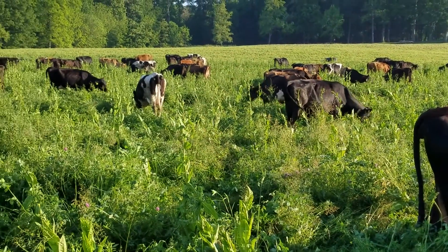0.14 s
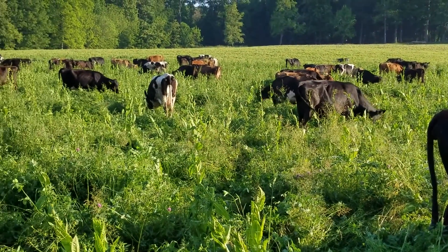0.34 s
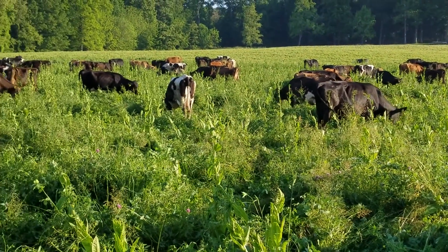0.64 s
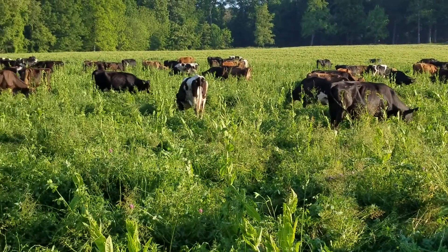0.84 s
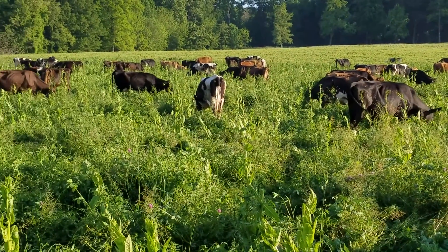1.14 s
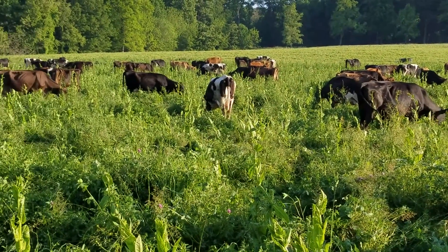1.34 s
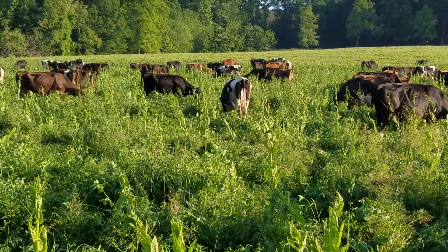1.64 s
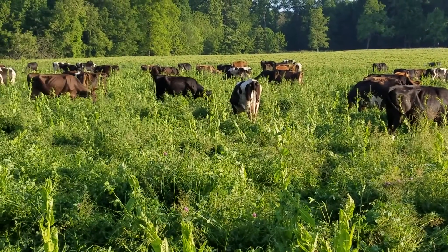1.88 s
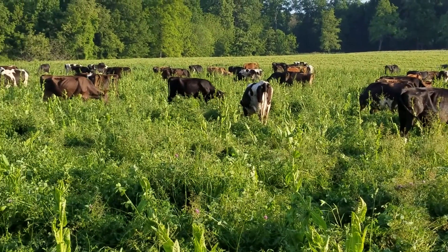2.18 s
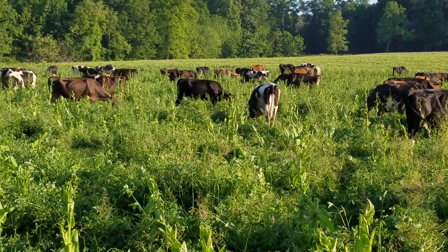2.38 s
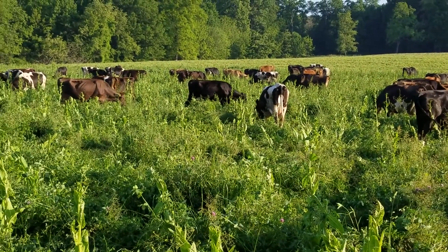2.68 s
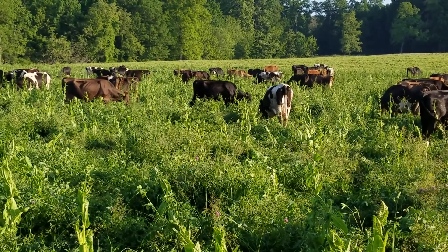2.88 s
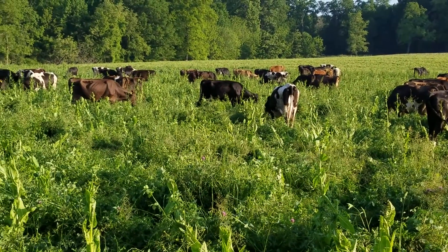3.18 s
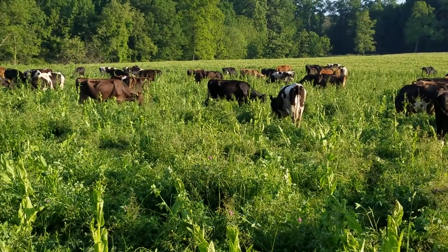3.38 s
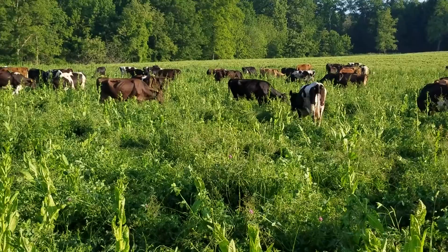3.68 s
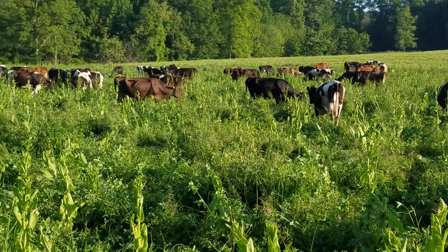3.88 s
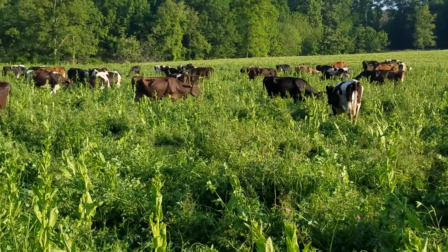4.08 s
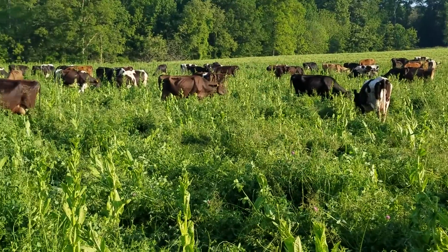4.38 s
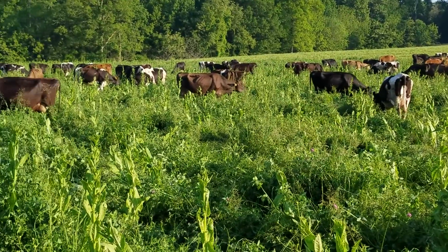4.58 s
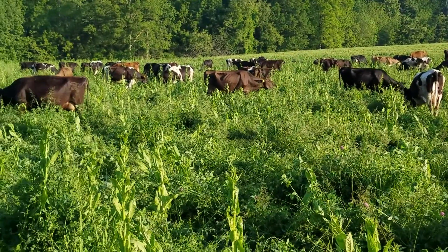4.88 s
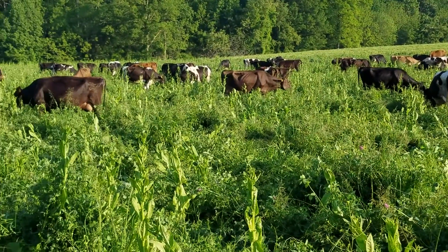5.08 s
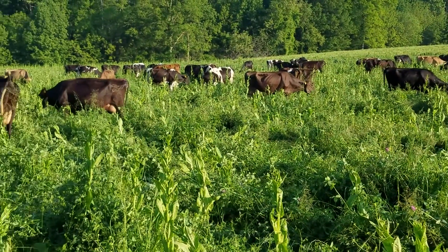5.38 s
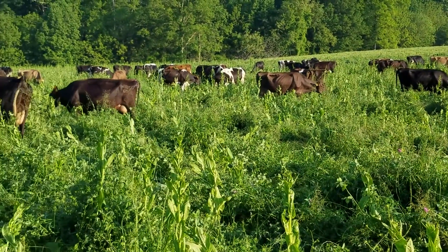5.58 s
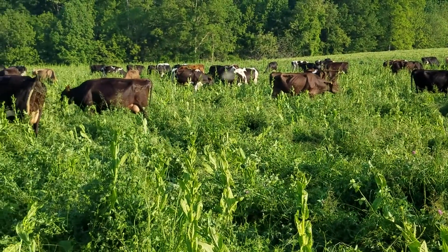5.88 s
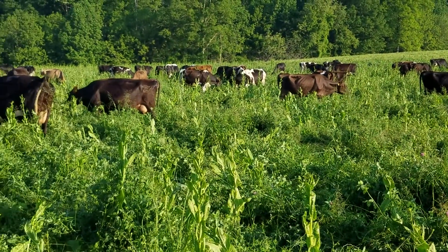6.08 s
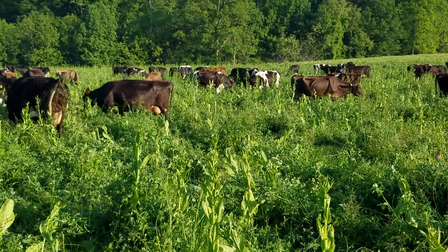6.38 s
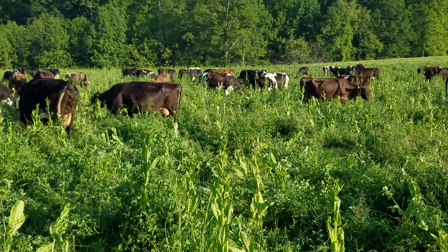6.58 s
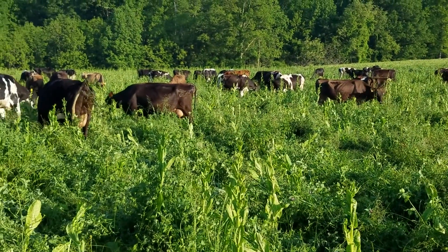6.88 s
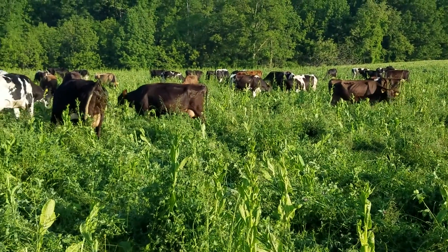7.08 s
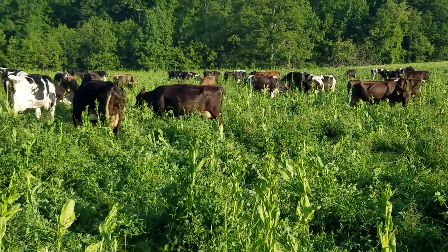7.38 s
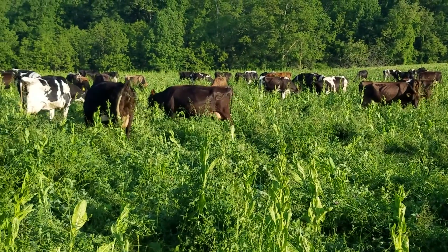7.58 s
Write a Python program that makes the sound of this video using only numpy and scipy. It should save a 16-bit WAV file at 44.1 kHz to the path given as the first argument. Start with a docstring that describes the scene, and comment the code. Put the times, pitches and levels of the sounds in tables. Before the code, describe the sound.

A far engine rumbles steadily beneath the rustle and crunch of grazing cows, with faint birdsong around the pasture.

```python
"""A far engine rumbles under a wash of distant noise, partly from the left, while cows graze close by.
Tall grass rustles, tears in bunches and snaps: each breaking fibre is a burst of fading noise.
A songbird on the right repeats a few motifs; others chip in runs, slur, twitter and whistle in
gliding near-sine notes, and one ends in a buzzy trill. Plants and trees add a short tail.
Light air flutters on the microphone and gusts twice."""
import sys
import numpy as np
from scipy import signal
from scipy.fft import rfft, irfft
from scipy.io import wavfile
from scipy.ndimage import map_coordinates

SR = 44100
rng = np.random.default_rng(int(sys.argv[2]) if len(sys.argv) > 2 else 0)


def dump_mix(stems):
    """Bounce the given channels to the path in sys.argv[1] as a 16-bit WAV at rate SR."""
    frames = np.atleast_2d(stems).T  # one column per channel
    limited = np.clip(frames, -1, 1)  # hard clip at full scale
    pcm = np.round(limited * 32767).astype(np.int16)
    wavfile.write(sys.argv[1], SR, pcm)


N = 341404
TIME_S = np.arange(N) / SR
BINS_HZ = np.maximum(np.fft.rfftfreq(N, 1 / SR), 1)

# Table levels precede each source's gains and filters. Pan is left minus right.
# Engine roar. Each row: frequency in Hz, relative density in dB.
ROAR_SPECTRUM = [(15, -15), (25, -27), (36, -10.5), (48, -4.5), (60, 6), (70, -0.5), (92, 7), (106, -2),
                 (128, 2.5), (152, -14), (168, -5.5), (180, -14), (220, -14.5), (300, -23.5), (500, -66)]
# Engine tones. Each row: frequency in Hz, width in Hz, level in dB.
ENGINE_TONES = [(79.34, 3.025, -49.5), (116.9, 4.98, -51.5), (144.4, 2.15, -49), (163.2, 5, -50),
                (217.2, 7.75, -67.5), (358, 6.43, -71), (472.4, 1.65, -62.5), (521, 5, -70),
                (955, 5.2, -72)]
# Rumble swell. Each row: middle and length in seconds, level in dB.
RUMBLE_SWELLS = [(3.25, 0.53, -43.5)]
# Distant wash. Each row: frequency in Hz, left and right density in dB.
WASH_SPECTRUM = [(189, -75.5, -75), (307, -78.5, -80.5), (410, -80.5, -78), (730, -83, -82.5),
                 (1130, -82.5, -80.5), (1214, -87.5, -83.5), (1900, -90, -88), (2340, -94.5, -98),
                 (2650, -95.5, -96.5), (3750, -106, -101), (5560, -113, -109), (7900, -119, -111),
                 (10500, -119, -104), (12000, -109, -111), (15300, -110, -110)]
# Directional part of the wash. Each row: frequency in Hz, power share from 0 to 1, left lead in ms.
WASH_DIRECTION = [(191, 0.84, 0.13), (348, 0.92, 0.23), (500, 0.75, 0.43), (690, 0.92, 0.38),
                  (1133, 0.93, 0.42), (1460, 0.42, 0.42), (1640, 0.32, 0.55), (2075, 1, 0.6),
                  (2400, 0.26, 0.55), (3030, 0.16, 0.456), (7000, 0.02, 0.51)]
# The microphone turns. Each row: time in seconds, added left lead in ms, wash gain in dB.
MIC_TURN = [(0, 0.052, 2.5), (.2, -0.028, 1.2), (.5, 0.021, 0), (1.8, -0.0017, 0.85), (3.0, -0.0019, 0.6),
            (4.5, -0.0086, 1.5), (6.0, -0.062, 0.3), (7.74, -0.049, 2)]
# Swells of noise near 1.8 kHz. Each row: middle and length in seconds, level in dB.
MID_BAND_SWELLS = [(0.11, 0.17, -59.5), (1.5, 1, -66.5), (3.03, .12, -60), (3.6, 1, -69.5)]
# Gusts. Each row: middle and length in seconds, level in dB.
GUSTS = [(5.0, 0.8, -47.5), (6.6, 0.56, -43.5)]

# Far chirps. Each row: start and end in seconds, level and pan in dB, lowest and highest centre in Hz.
FLURRIES = [(.1, 3.3, -76, -2, 2800, 4200), (3.42, 3.8, -73, -3, 3010, 4300),
            (5.1, 7.1, -77.5, -9, 3100, 4100)]
# Chirp count of each flurry.
CHIRPS_IN_FLURRY = (16, 24, 20)
# Far twitter. Each row: start and length in seconds, level in dB, three pitches in Hz.
TWITTER_NOTES = [(5.455, .018, -74, 3400, 4100, 4900), (6.038, .018, -71.5, 3500, 4100, 4800),
                 (6.145, .04, -78.5, 5450, 5350, 5600), (6.24, .035, -77, 3900, 4500, 4650),
                 (6.36, .02, -75.5, 3400, 3800, 4100), (6.385, .028, -80, 4600, 5200, 5600),
                 (6.6, .025, -77, 4700, 4100, 3600), (6.818, .032, -75, 4150, 4700, 4950),
                 (6.848, .024, -74.5, 4800, 3950, 3300)]
# Plain whistles. Each row: start and length in seconds, level and pan in dB, five pitches in Hz.
WHISTLE_NOTES = [(0, 0.047, -74, -11, 4050, 4000, 4000, 4020, 3900),
                 (1.4, 0.042, -73, -10, 4430, 4330, 4330, 4320, 4300),
                 (4.312, .026, -69, -6, 4920, 4980, 5080, 5130, 5230),
                 (4.405, .135, -66.5, -2, 5200, 5030, 5010, 4870, 4870),
                 (4.53, 0.122, -69, 0, 4820, 4870, 4920, 4900, 4860),
                 (4.645, .04, -78, -1, 4770, 4720, 4640, 4620, 4600),
                 (5.71, 0.132, -69, 5.5, 2500, 2380, 2346, 2340, 2350),
                 (6.45, 0.59, -78, 9, 2690, 2730, 2724, 2785, 2760),
                 (6.98, 0.065, -66, 14, 2780, 2800, 2890, 3040, 3220)]
# One slur: fall, rise, drop. Each row: delay and length in seconds, three pitches in Hz.
SLUR_SHAPE = [(0, 0.03, 3550, 2980, 2740), (0.031, 0.044, 2740, 2950, 3380),
              (0.078, .022, 3250, 2930, 2700)]
# Slurred calls. Each row: start in seconds, levels of fall, rise and drop in dB.
SLUR_CALLS = [(.255, -76, -76, -81), (.55, -77, -77, -82), (1.06, -86, -78, -84), (1.192, -72, -83, -86),
              (1.495, -72, -72, -78), (2.044, -77, -87, -86), (2.441, -76, -71, -75),
              (3.38, -72, -70.5, -74), (3.91, -70, -78, -81), (4.42, -76, -77, -74), (4.88, -72, -76, -77),
              (5.41, -76, -83, -82), (6.428, -68, -84, -84)]
# One chip: steep rise, flick down. Each row: delay and length in seconds, gain in dB, three pitches in Hz.
CHIP = [(0, .024, 3, 3336, 4090, 4930), (.025, 0.0093, -12, 4930, 3770, 2800)]
# Chip runs. Each row: start, first gap and gap growth in seconds; level, fade at the ends and pan in dB.
CHIP_RUNS = [(2.569, .0765, .0009, -64.5, 5, -4), (3.73, .0865, .006, -68.5, 5, -10.5)]
# Chip count of each run.
CHIPS_IN_RUN = (11, 7)
# Lead-in to the trill. Each row: start and length in seconds, level and pan in dB, three pitches in Hz.
TRILL_LEAD = [(7.052, 0.044, -64, -9, 2430, 2410, 2420), (7.06, 0.052, -65.5, -11, 2130, 2154, 2160),
              (7.15, .042, -62, 6, 1606, 1635, 1660), (7.159, 0.007, -62.5, -14, 4700, 3500, 2700),
              (7.203, .013, -62, -6, 2020, 2180, 2380), (7.225, 0.013, -67, -14, 4860, 5140, 5460)]
# Course of the trill. Each row: time in seconds, beats per second, level in dB.
TRILL_CURVE = [(7.29, 33, -78), (7.305, 33, -62.5), (7.5, 30, -60.5), (7.65, 27, -60.5), (7.74, 26, -62)]
# Buzz partials. Each row: harmonic number, gain and pan in dB.
BUZZ_PARTIALS = [(4, -10, -3), (5, -2.8, 4.5), (6, -8.3, -6.5), (7, -11.7, 3), (8, -25, 0), (9, -9.5, -8)]
# Songbird motifs. Each row: syllable delay and length in seconds, gain in dB, four pitches in Hz.
OPENING = [(0, .052, -6, 6760, 7060, 7400, 7550), (.068, .033, -2.5, 5240, 5650, 5880, 5700),
           (.094, .028, .5, 5400, 4550, 3950, 3500), (.146, .042, -3, 4640, 4670, 4670, 4620)]
ARCH = [(0, 0.048, 4, 3790, 3760, 3600, 3170), (.088, 0.072, -2.8, 5680, 6240, 6440, 5640),
        (0.154, 0.024, -6.5, 5630, 4600, 3620, 2700)]
BOW = [(0, 0.029, 3.5, 3150, 3600, 3920, 4200), (.036, .025, -3, 4250, 4360, 4700, 4850),
       (.072, .062, -3, 5000, 4630, 4200, 4050)]
QUICK_PAIR = [(0, 0.0247, 0, 4270, 3940, 3550, 3250), (0.054, .053, 0, 3320, 3710, 3940, 4180)]
CHATTER = [(-.006, 0.04, -1.1, 4780, 4300, 3970, 3800), (.085, 0.0307, 0.15, 4390, 3950, 3650, 3440),
           (.192, .078, -1, 2880, 3280, 3800, 4600)]
# The song. Each row: start in seconds, motif, level in dB.
PHRASES = [(1.554, OPENING, -70), (1.817, OPENING, -68), (2.083, OPENING, -68), (2.349, ARCH, -65),
           (2.584, ARCH, -64.5), (2.828, BOW, -65), (3.09, QUICK_PAIR, -65.5), (3.296, QUICK_PAIR, -64.5)]
# Closing chatter. Each row: start in seconds, level in dB.
CHATTER_REPEATS = [(3.55, -74.5), (3.914, -76), (4.279, -72), (4.68, -72.5)]

# Crunch of breaking grass. Each row: frequency in Hz, left and right relative level in dB.
CRUNCH_SPECTRUM = [(1510, -10, 5.5), (2660, 4.5, 3), (3740, -15, 0.5), (4930, -6, -16), (7170, -24, -10),
                   (8900, -27, -3), (10240, -37, 5), (12300, -10, -5.5), (13200, -7, -13), (14200, -3, -6),
                   (15800, -19, 2.5)]
# Thin crack of dry fibres. Each row: frequency in Hz, left and right relative level in dB.
CRACK_SPECTRUM = [(8000, -30, -17), (10500, -12, -14), (12600, 0, -1), (15400, 0, 2)]
# The herd stirs the grass, less as it falls behind. Each row: time in seconds, level in dB.
HERD_STIR = [(0, -72), (1.1, -66.5), (2.2, -70.5), (4.6, -67), (5.1, -92), (7.74, -84)]
# A muzzle or leg pushes through stems. Each row: middle and length in seconds, level in dB.
SWISHES = [(.19, 0.15, -60.5), (.52, 0.089, -59), (.87, 0.28, -66), (1.28, 0.097, -64.5), (1.65, .17, -63),
           (2.08, 0.071, -65), (2.63, 0.14, -60.5), (3.47, 0.082, -59), (4.24, 0.089, -61),
           (4.77, 0.1, -64), (5.39, 0.096, -63.5), (6.22, 0.15, -66), (6.56, .07, -64), (6.95, 0.2, -67)]
# A bunch tears. Each row: start and length in seconds, crunch and crack level in dB.
TEARS = [(0.803, 0.05, -73, -68), (0.816, 0.0086, -66.5, -63), (1.368, 0.012, -59, -72),
         (1.441, 0.017, -63.5, -74), (1.593, 0.07, -67, -77), (1.702, 0.054, -63.5, -82),
         (3.02, 0.047, -55.5, -74), (3.745, 0.041, -61.5, -76), (3.797, 0.064, -64, -75),
         (4.104, 0.029, -69, -76), (4.393, 0.016, -61.5, -70), (4.585, .024, -74, -67),
         (5.733, 0.042, -72, -69), (6.536, 0.049, -61.5, -80), (7.076, 0.027, -65.5, -80),
         (7.259, 0.015, -58, -72), (7.29, 0.045, -64, -74)]
# A thick stem snaps. Each row: start in seconds, crunch and crack level in dB.
SNAPS = [(0.038, -60, -62), (.25, -58.5, -68), (.298, -63, -60), (0.747, -64, -75), (.813, -68, -56),
         (0.917, -60, -64), (1.481, -53, -72), (1.515, -62, -70), (1.623, -57, -65), (1.652, -57, -65),
         (1.661, -56, -65), (1.739, -59, -66), (1.859, -60, -68), (2.035, -65, -70), (2.075, -59, -70),
         (2.372, -63, -70), (3.046, -56, -66), (3.857, -57, -63), (4.397, -61, -65), (4.45, -56, -59),
         (4.62, -62, -58), (4.934, -62, -67), (5.103, -64, -67), (5.407, -62, -66), (5.862, -66, -72),
         (6.155, -60, -56), (6.178, -64, -70), (7.26, -61, -62), (7.316, -58, -62)]


def from_db(db):
    """Decibels to gain."""
    return 10 ** (np.asarray(db) / 20)


def unit_rms(x):
    """Scale to unit power."""
    return x / np.sqrt(np.mean(x ** 2) + 1e-20)


def in_time(rows):
    """Each column of a curve at every sample."""
    times_s, *columns = np.transpose(rows)
    return [np.interp(TIME_S, times_s, c) for c in columns]


def in_hz(rows):
    """Each column of a spectrum at every bin."""
    hz, *columns = np.transpose(rows)
    return np.array([np.interp(np.log(BINS_HZ), np.log(hz), c) for c in columns])


def colour(x, gain):
    """Filter by a gain per bin."""
    return irfft(rfft(x) * gain, N)


def highpass(edge_hz):
    """Fourth-order high-pass gain per bin."""
    return 1 / np.sqrt(1 + (edge_hz / BINS_HZ) ** 8)


def band_noise(centre_hz, sharpness, order=2, shape=N):
    """Unit-power noise in one band."""
    detuning = sharpness * (BINS_HZ / centre_hz - centre_hz / BINS_HZ)
    return unit_rms(colour(rng.standard_normal(shape), 1 / (1 + detuning ** order)))


def drift(rate_hz):
    """Unit-power random wander, mostly below rate_hz."""
    return unit_rms(colour(rng.standard_normal(N), 1 / (1 + (BINS_HZ / rate_hz) ** 2)))


def swells(rows, floor_db=-np.inf):
    """Bell-shaped swells add in power over a floor; length is the time above half power."""
    power = from_db(floor_db) ** 2
    for middle_s, length_s, level_db in rows:
        bell = 0.5 ** np.minimum((2 * (TIME_S - middle_s) / length_s) ** 2, 100)
        power = power + from_db(level_db) ** 2 * bell
    return np.sqrt(power)


def pan(pan_db):
    """Left and right gains; positive is left."""
    return from_db(np.array([[0.5], [-0.5]]) * pan_db)


def from_left(x, lead_ms):
    """Stereo pair in which the right side arrives lead_ms later."""
    delayed = map_coordinates(x, [np.arange(N) - lead_ms * SR / 1000], order=3, mode="nearest")
    return np.array([x, delayed])


def scatter(x, tail_db, rt60_s):
    """Plants and trees add a thin, short tail."""
    age_s = TIME_S[:SR // 2]
    response = rng.standard_normal((2, len(age_s))) * from_db(-60 * age_s / rt60_s)
    response *= from_db(tail_db) / np.sqrt(np.sum(response ** 2) / 2)
    return x + signal.fftconvolve(x, response, axes=1)[:, :N]


def engine(roar_db=-41.5, pan_db=1.1):
    """Only the low roar and a few tones carry this far; the air makes the tones waver."""
    spectrum = from_db(in_hz(ROAR_SPECTRUM)[0]) * (BINS_HZ < 900)
    sound = from_db(roar_db) * unit_rms(colour(rng.standard_normal(N), spectrum))
    for hz, width_hz, level_db in ENGINE_TONES:
        phase = 2 * np.pi * np.cumsum(hz + 0.4024 * width_hz * drift(3.94)) / SR
        sound += from_db(level_db) * unit_rms(np.sin(phase) * from_db(1.9 * drift(width_hz)))
    return from_left(sound, lead_ms=0.29) * pan(pan_db)


def rumble_swell(pan_db=1.0):
    """The upper part of the rumble rises for a moment."""
    rumble = swells(RUMBLE_SWELLS) * band_noise(centre_hz=143, sharpness=5.8, order=6)
    return from_left(rumble, lead_ms=0.34) * pan(pan_db)


def distant_wash(gain_db=-1.46, waver_db=0.4):
    """Distant noise, partly from the left and partly from all round."""
    share, lead_ms = in_hz(WASH_DIRECTION)
    turn_ms, turn_db = in_time(MIC_TURN)
    right_lag = np.exp(-2j * np.pi * BINS_HZ * lead_ms / 1000 * np.array([[0], [1]]))
    directed = colour(from_left(rng.standard_normal(N), turn_ms), np.sqrt(share) * right_lag)
    diffuse = colour(rng.standard_normal((2, N)), np.sqrt(1 - share))
    wash = colour(directed + diffuse, from_db(in_hz(WASH_SPECTRUM)) * highpass(216)) * np.sqrt(SR / 2)
    return wash * from_db(gain_db + turn_db + waver_db * drift(3.2))


def mid_band_swell(pan_db=-2):
    """A band of noise near 1.8 kHz swells, partly the crunch of tearing grass."""
    return swells(MID_BAND_SWELLS) * band_noise(centre_hz=1780, sharpness=5, shape=(2, N)) * pan(pan_db)


def breeze(pan_db=2.5):
    """Light air makes a soft, low flutter on the microphone."""
    return swells(GUSTS, floor_db=-54.5) * band_noise(centre_hz=50, sharpness=3.6) * pan(pan_db)


def glides(notes, taper, waver, flutter_db, lead_ms=0, tilt_db_per_oct=0):
    """Near-sine notes bend through their pitches; paths through the grass make them flutter."""
    out = np.zeros((2, N))
    wobble = 1 + waver * drift(270)
    flutter = from_db(flutter_db * np.array([drift(130), drift(140)]))
    for start_s, length_s, level_db, pan_db, *pitches_hz in notes:
        span = np.arange(int(start_s * SR), min(int((start_s + length_s) * SR), N))
        bend = np.polyfit(np.linspace(0, 1, len(pitches_hz)), pitches_hz, len(pitches_hz) - 1)
        hz = np.polyval(bend, np.linspace(0, 1, len(span))) * wobble[span]
        cycles = np.cumsum(hz) / SR - hz * np.array([[0], [lead_ms]]) / 1000
        envelope = signal.windows.tukey(len(span), taper) * flutter[:, span]
        gain = from_db(level_db + tilt_db_per_oct * np.log2(hz / 4000))
        out[:, span] += gain * pan(pan_db) * unit_rms(envelope * np.sin(2 * np.pi * cycles))
    return out


def motif_notes(motif, start_s, level_db, pan_db):
    """Notes of one motif at a given time, level and side."""
    return [(start_s + delay_s, length_s, level_db + gain_db, pan_db, *pitches_hz)
            for delay_s, length_s, gain_db, *pitches_hz in motif]


def far_birds(chirp_s=0.025, bend=0.126):
    """Flurries of faint chirps at uneven times and pitches, each rising or falling steeply."""
    notes = []
    for (start_s, end_s, level_db, pan_db, low_hz, high_hz), count in zip(FLURRIES, CHIRPS_IN_FLURRY):
        for k, (jitter, height, coin) in enumerate(rng.random((count, 3))):
            onset_s = start_s + (end_s - start_s) * (k + jitter) / count
            hz = low_hz * (high_hz / low_hz) ** height
            rise = bend * np.sign(coin - 0.5)
            notes.append((onset_s, chirp_s, level_db, pan_db, hz * (1 - rise), hz * (1 + rise)))
    return glides(notes, taper=0.4, waver=0.012, flutter_db=4.5)


def twittering_bird(pan_db=-10):
    """Loose, hoarse notes from far to the right."""
    notes = [(start_s, length_s, level_db, pan_db, *pitches_hz)
             for start_s, length_s, level_db, *pitches_hz in TWITTER_NOTES]
    return glides(notes, taper=0.28, waver=0.023, flutter_db=3)


def whistling_birds():
    """Plain, nearly steady tones."""
    return glides(WHISTLE_NOTES, taper=0.15, waver=0.0075, flutter_db=0.5)


def slurring_bird(pan_db=14.5):
    """A slightly hoarse call on the left falls, rises and drops, with shifting stress."""
    notes = []
    for start_s, *levels_db in SLUR_CALLS:
        for (delay_s, length_s, *pitches_hz), level_db in zip(SLUR_SHAPE, levels_db):
            notes.append((start_s + delay_s, length_s, level_db, pan_db, *pitches_hz))
    return glides(notes, taper=0.25, waver=0.018, flutter_db=2.5)


def chipping_birds():
    """Each run repeats one chip; the gaps lengthen while the level rises and falls."""
    notes = []
    for (start_s, gap_s, growth_s, level_db, fade_db, pan_db), count in zip(CHIP_RUNS, CHIPS_IN_RUN):
        for k, from_middle in enumerate(np.linspace(-1, 1, count)):
            onset_s = start_s + k * gap_s + growth_s * k * (k - 1) / 2
            notes += motif_notes(CHIP, onset_s, level_db - fade_db * from_middle ** 2, pan_db)
    return glides(notes, taper=0.38, waver=0.012, flutter_db=4.5, tilt_db_per_oct=-6)


def trill_lead():
    """Short low and high notes ahead of the trill."""
    return glides(TRILL_LEAD, taper=0.39, waver=0.014, flutter_db=2.5)


def trill(buzz_hz=567, rasp_db=2.5, blip_db=5, blip_low_hz=2550, blip_top_hz=3000):
    """Quick falling chips, then an arched blip of uneven force alternates with a buzz, slowing down."""
    beats_per_s, level_db = in_time(TRILL_CURVE)
    singing = TIME_S > TRILL_CURVE[0][0]
    beat = (np.cumsum(beats_per_s * singing) / SR + 0.6) % 1
    arch = np.exp(-((beat - 0.14) / 0.14) ** 2)
    blip_hz = (blip_low_hz + (blip_top_hz - blip_low_hz) * arch) * (1 + 0.035 * drift(300))
    blip_gain = from_db(blip_db + 2 * drift(60)) * pan(4) * arch
    voice = blip_gain * np.sin(2 * np.pi * np.cumsum(blip_hz) / SR)
    buzz_gate = np.interp(beat, [0, 0.25, 0.38, 0.92, 1], [0.15, 0.15, 1, 1, 0.15])
    buzz_phase = 2 * np.pi * np.cumsum(buzz_hz * (1 + 0.0055 * drift(116))) / SR
    for harmonic, gain_db, pan_db in BUZZ_PARTIALS:
        rasp = unit_rms(from_db(rasp_db * drift(150)))
        voice += from_db(gain_db) * pan(pan_db) * buzz_gate * rasp * np.sin(harmonic * buzz_phase)
    chip_notes = [(7.234 + 0.0085 * k, 0.007, -58 - 1.2 * k, 0, 5300, 3200, 2900) for k in range(7)]
    chips = glides(chip_notes, taper=0.4, waver=0.03, flutter_db=2.5)
    return chips + np.sqrt(2) * voice * singing * from_db(level_db)


def songbird(pan_db):
    """A bubbling song of repeated motifs; its high notes arrive weaker."""
    notes = []
    for start_s, motif, level_db in PHRASES:
        notes += motif_notes(motif, start_s, level_db, pan_db)
    return glides(notes, taper=0.38, waver=0.007, flutter_db=2.2, lead_ms=-0.048, tilt_db_per_oct=-5.5)


def songbird_chatter(pan_db):
    """The soft, slightly hoarse close of the song."""
    notes = []
    for start_s, level_db in CHATTER_REPEATS:
        notes += motif_notes(CHATTER, start_s, level_db, pan_db)
    return glides(notes, taper=0.23, waver=0.016, flutter_db=3, tilt_db_per_oct=-11)


def fibres(per_s, spread_db, decay_s):
    """Fibres break at random with uneven force; leaves scatter each crack differently to each side."""
    breaks = rng.random(N) < per_s / SR
    force = from_db(spread_db * np.minimum(rng.exponential(1, N), 4))
    power = signal.lfilter([1], [1, -np.exp(-1 / (decay_s * SR))], (breaks * force) ** 2 + 1e-18)
    return unit_rms(np.sqrt(power) * rng.standard_normal((2, N)))


def stirring_leaves(rustle_db=-0.5, tick_db=-9, shake_delay_s=0.042, shake_s=0.098, shake_db=-1.5):
    """Rustle and small ticks: cows push through the plants, which also shake after each tear."""
    shakes = [(start_s + shake_delay_s, shake_s, crunch_db + shake_db)
              for start_s, _, crunch_db, _ in TEARS]
    motion = swells(SWISHES + shakes, floor_db=in_time(HERD_STIR)[0]) * from_db(1.5 * drift(14))
    rustle = from_db(rustle_db) * motion * fibres(per_s=6800, spread_db=-2, decay_s=0.0004)
    ticks = from_db(tick_db) * motion * fibres(per_s=70, spread_db=2.5, decay_s=0.0015)
    return rustle, ticks


def tearing_bunches(gain_db=6.5):
    """Crunch and crack of many fibres ripping together."""
    envelopes = np.zeros((2, 1, N))
    for start_s, length_s, *levels_db in TEARS:
        corners_s = start_s + length_s * np.array([-0.22, 0.041, 0.62, 1.4])
        envelopes += from_db(levels_db)[:, None, None] * np.interp(TIME_S, corners_s, [0, 1, 1, 0])
    return from_db(gain_db) * envelopes * fibres(per_s=1000, spread_db=2.1, decay_s=0.0006)


def snapping_stems(gain_db=8, crunch_decay_s=0.0048, crack_decay_s=0.0028):
    """Crunch and crack of single thick stems: sudden noise that dies fast."""
    envelopes = np.zeros((2, 1, N))
    for start_s, crunch_db, crack_db in SNAPS:
        first = int(start_s * SR)
        age_s = TIME_S[:min(SR // 10, N - first)]
        span = slice(first, first + len(age_s))
        envelopes[0, 0, span] += from_db(crunch_db) * np.exp(-age_s / crunch_decay_s)
        envelopes[1, 0, span] += from_db(crack_db) * np.exp(-age_s / crack_decay_s)
    return from_db(gain_db) * envelopes * rng.standard_normal((2, 2, N))


def grazing():
    """Cows stir, tear and snap the grass; thin leaves lack the low crunch of the stems."""
    rustle, ticks = stirring_leaves()
    tear_crunch, tear_crack = tearing_bunches()
    snap_crunch, snap_crack = snapping_stems()
    stem_gain = unit_rms(from_db(in_hz(CRUNCH_SPECTRUM)) * highpass(1300))
    leaves = colour(rustle + tear_crunch, stem_gain * (0.5 + 0.5 * highpass(3500)))
    stems = colour(ticks + snap_crunch, stem_gain)
    cracks = colour(tear_crack + snap_crack, unit_rms(from_db(in_hz(CRACK_SPECTRUM))))
    return leaves + stems + cracks


def scene(song_pan_db=-12.5):
    """Engine and wash behind, birds in the field, grazing close by."""
    birds = scatter(songbird(song_pan_db), tail_db=-4, rt60_s=0.17)
    birds += scatter(songbird_chatter(song_pan_db), tail_db=2, rt60_s=0.25)
    birds += scatter(chipping_birds() + slurring_bird(), tail_db=1, rt60_s=0.17)
    birds += scatter(whistling_birds(), tail_db=-10, rt60_s=0.24)
    birds += scatter(trill_lead(), tail_db=-3, rt60_s=0.23)
    birds += scatter(trill(), tail_db=-8, rt60_s=0.22)
    birds += scatter(far_birds() + twittering_bird(), tail_db=-1, rt60_s=0.28)
    cows = scatter(grazing(), tail_db=-11, rt60_s=0.05)
    background = engine() + rumble_swell() + breeze() + distant_wash()
    return background + mid_band_swell() + birds + cows


def record(dry):
    """Steep low-pass at 15.8 kHz."""
    return colour(dry, 1 / np.sqrt(1 + (BINS_HZ / 15800) ** 400))


dry = scene()
out = record(dry)
dump_mix(out)
```